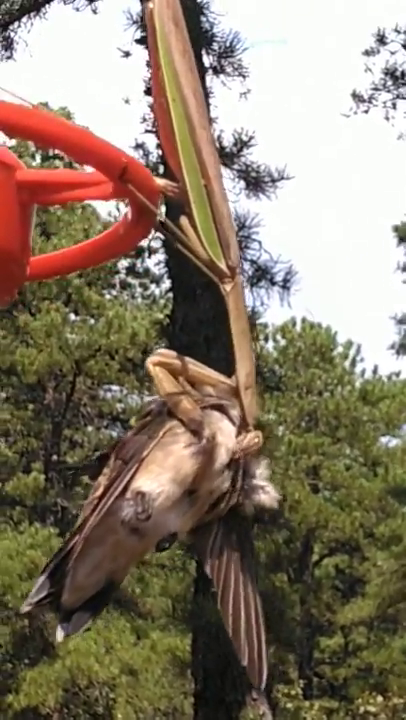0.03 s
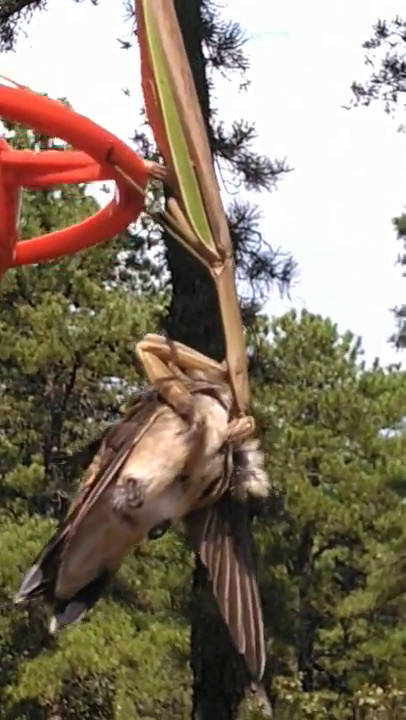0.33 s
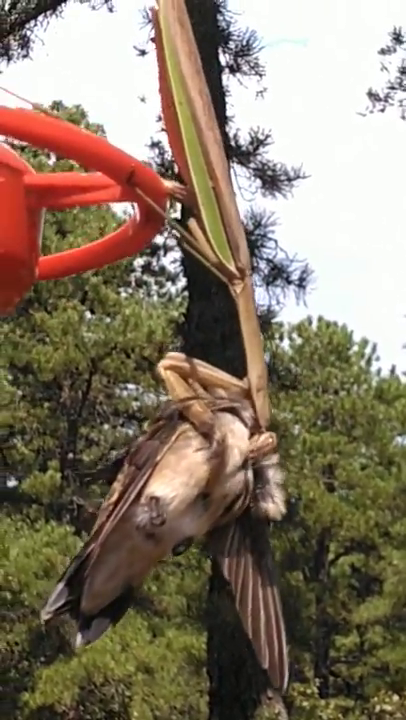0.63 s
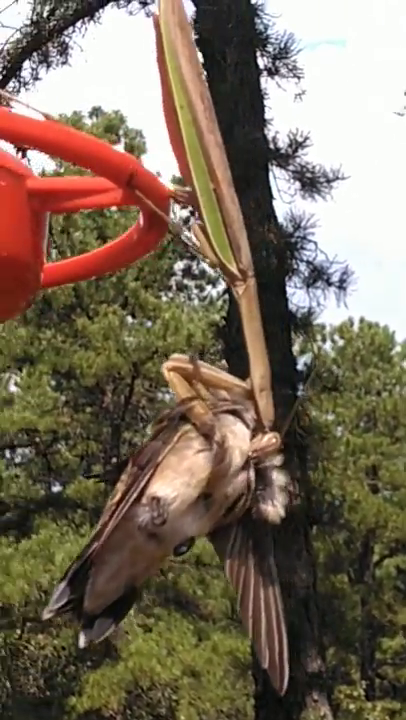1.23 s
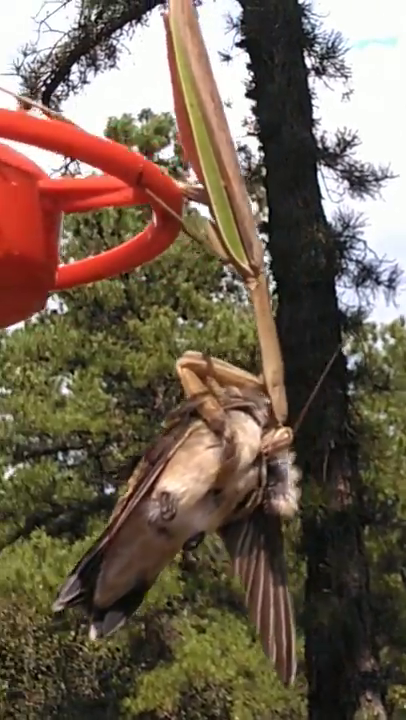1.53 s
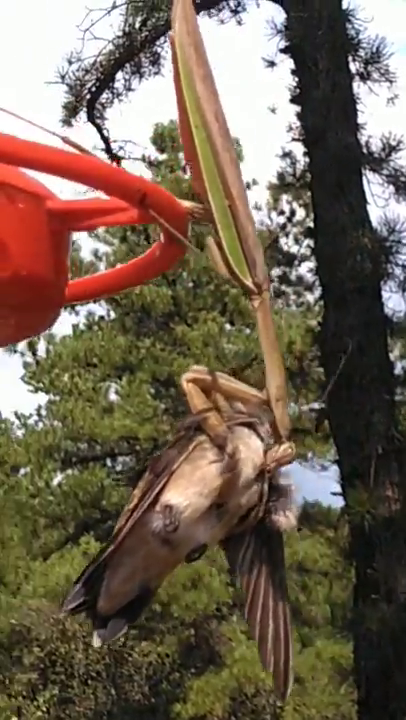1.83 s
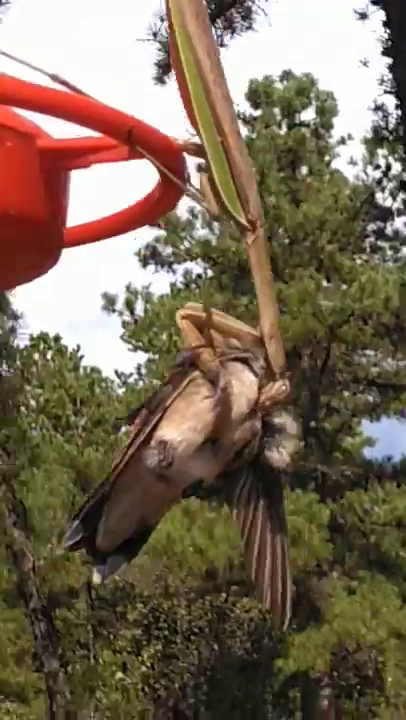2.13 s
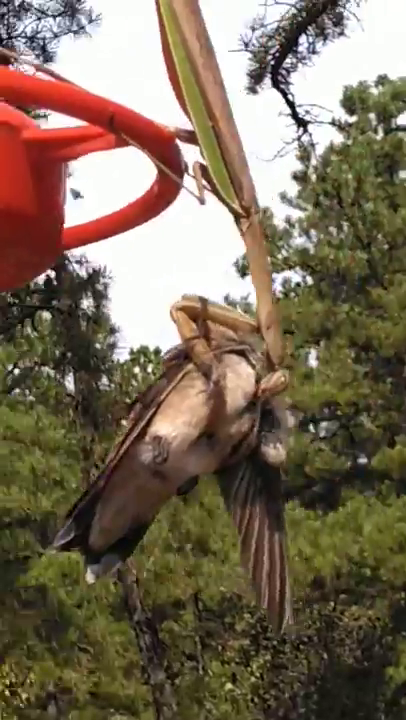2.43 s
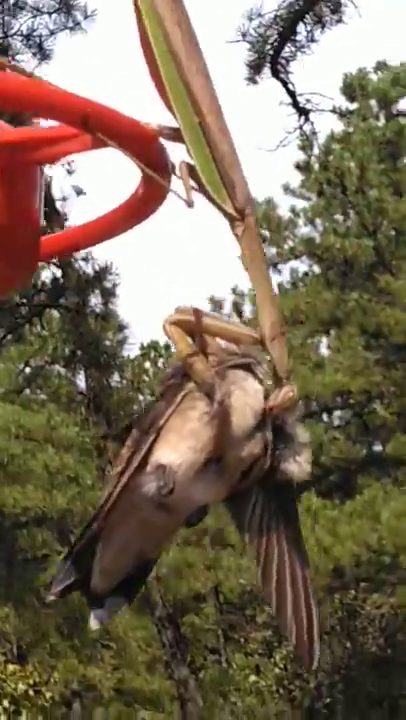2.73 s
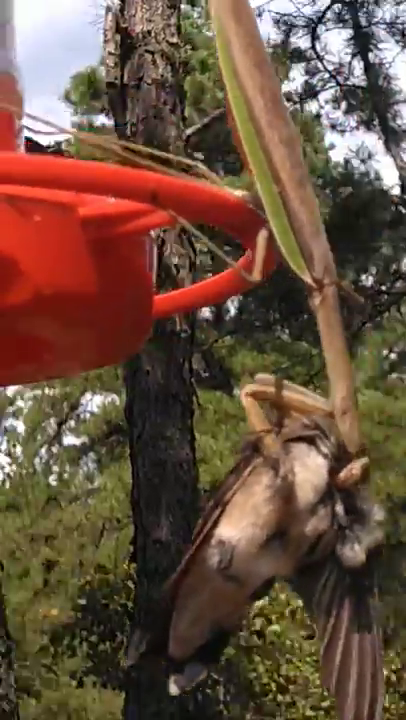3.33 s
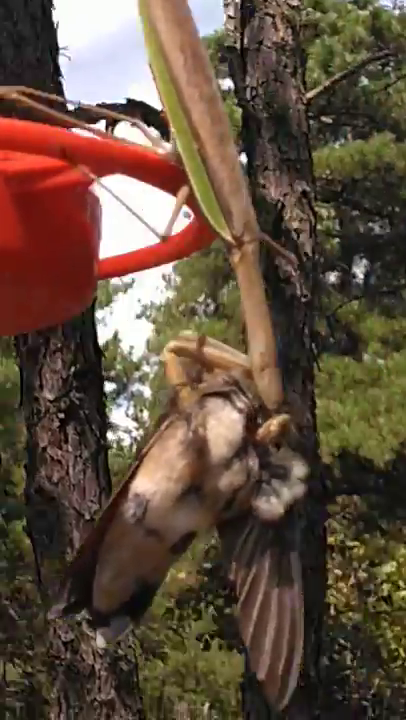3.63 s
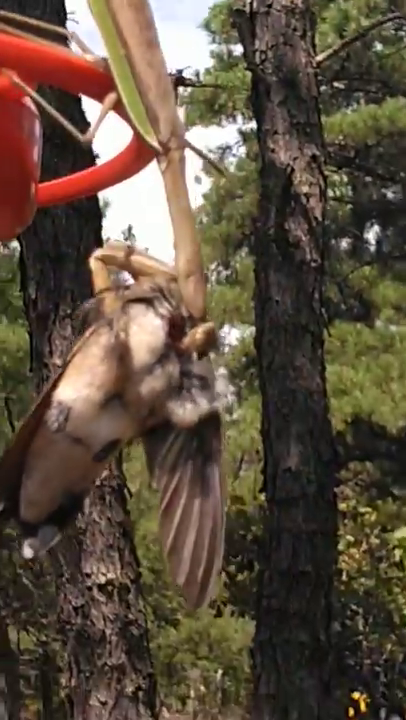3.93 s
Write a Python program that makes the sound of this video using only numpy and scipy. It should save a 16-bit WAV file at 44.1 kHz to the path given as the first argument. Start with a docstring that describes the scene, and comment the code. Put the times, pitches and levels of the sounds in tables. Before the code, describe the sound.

Faint open-air hiss, then a crunchy, crackling shuffle on dry leaves and twigs.

```python
"""First you hear the soft hiss and low rumble of open air in a pine wood, and a few dull bumps as a
hand shifts on a camera. After two seconds someone shuffles over dry needles and leaves: the ground
crunches under the weight, needles crackle, leaves scrape the sole, twigs snap and brittle bits tick.
Crunch, crackle and scrape are each a swarm of tiny clicks. The microphone's opening rings high in
the treble, so the hiss, sizzle, crackle and ticks are strongest near 13 kHz."""
import sys
import numpy as np
from scipy import signal
from scipy.fft import rfft, irfft
from scipy.io import wavfile
from scipy.ndimage import map_coordinates

SR = 44100
rng = np.random.default_rng(int(sys.argv[2]) if len(sys.argv) > 2 else 0)


def wrap_up_sound(samples):
    """Save the sound to the file named by the first command line argument, as 16-bit audio."""
    columns = np.atleast_2d(samples).T
    # keep every value between -1 and 1, then stretch to whole-number steps
    tamed = np.clip(columns, -1, 1)
    steps = np.round(tamed * 32767).astype(np.int16)
    wavfile.write(sys.argv[1], SR, steps)


N = 176400
TIME = np.arange(N) / SR
FREQS = np.fft.rfftfreq(2 * N, 1 / SR)

# Tone of each background sound, from low to high: pitch_hz, level_db
AIR_TONE = [(12, -47), (20, -20), (48, -2.5), (64, -4), (92, -5.5), (198, -11.5), (445, -14), (478, -13.5),
            (668, -13.5), (789, -15), (1370, -18.5), (2310, -28), (6000, -32), (7800, -55), (13200, -120)]
HISS_TONE = [(2000, -28), (5000, -14.5), (7000, -6), (11500, -7), (12800, -6), (13500, 0.5), (14400, -8.5),
             (15800, -4.5)]
CHIRR_TONE = [(6000, -38), (7200, -9), (7800, -3), (8300, -7.5), (9300, -40)]
SIZZLE_TONE = [(9000, -19), (12000, -8), (13500, -1), (14500, -11), (16000, -30)]
# How the far sizzle comes and goes: time_s, level_db
SIZZLE_LEVELS = [(.23, -62.5), (.3, -76), (.66, -74), (.78, -67), (1.3, -63), (1.5, -67), (2.1, -65)]
# Bumps of the hand on the camera: start_s, level_db, pitch_hz
BUMPS = [(.004, -40.5, 68), (1.294, -41.5, 63), (1.562, -46, 69.5), (1.756, -39.5, 69.4),
         (2.527, -41.5, 79)]
# Twigs snapping: start_s, level_db, pitch_hz
SNAPS = [(1.925, -40, 1740), (2.1618, -37, 3080), (2.2724, -37.5, 3200), (2.4182, -28, 2600),
         (2.5358, -29, 1760), (2.556, -29, 2190), (2.5678, -21, 2130), (2.5864, -26, 2490),
         (2.6293, -27, 2070), (2.633, -27, 2020), (2.6382, -30.5, 1520), (2.7215, -33, 1970),
         (2.748, -21.5, 2760), (2.5737, -31, 2000), (2.7483, -27.5, 1090), (2.779, -44, 1150),
         (2.8978, -32.5, 3340), (2.97, -32, 3550), (3.0080, -26.5, 1990), (3.0137, -34, 2800),
         (3.1630, -34.5, 2160), (3.3291, -30, 1620), (3.3691, -29.5, 2010), (3.4032, -36, 1900),
         (3.527, -30, 2220), (3.5977, -33, 1820), (3.733, -41.5, 3150), (3.765, -35.5, 3300),
         (3.834, -37.5, 2760), (3.9085, -34.5, 2350), (3.9534, -36.5, 3240), (3.9747, -35.5, 2380)]
# The notes one twig rings with, all at once: pitch_ratio, level_db
TWIG_NOTES = [(.38, -13.5), (.58, -6), (.8, 4), (1.03, 7.5), (1.35, -1)]
# How each sound under the foot swells and fades: time_s, relative_level_db
CRUNCH_LEVELS = [(2.05, -63), (2.12, -58), (2.165, -50.5), (2.205, -60), (2.32, -52), (2.375, -54),
                 (2.44, -42.5), (2.51, -50.5), (2.56, -41), (2.605, -53), (2.635, -42), (2.685, -60),
                 (2.72, -42), (2.745, -53.5), (2.79, -46.5), (2.84, -55), (2.975, -51.5), (3.01, -39.5),
                 (3.04, -46.5), (3.14, -53), (3.23, -49.5), (3.28, -47), (3.31, -49.5), (3.385, -43.5),
                 (3.43, -45), (3.49, -46.5), (3.58, -45), (3.635, -51), (3.68, -69), (3.76, -59),
                 (4.0, -64)]
CRACKLE_LEVELS = [(2.05, -65), (2.13, -54), (2.19, -50), (2.23, -40.5), (2.265, -41), (2.29, -44),
                  (2.32, -35.5), (2.34, -38), (2.372, -37), (2.41, -39.5), (2.51, -43.5), (2.55, -37),
                  (2.61, -46), (2.69, -49), (2.72, -47), (2.745, -52), (2.80, -46.5), (2.87, -38.5),
                  (2.93, -42), (2.975, -46), (3.012, -38.5), (3.04, -45.5), (3.11, -45.5), (3.19, -50.5),
                  (3.31, -50.5), (3.38, -45.5), (3.49, -45), (3.53, -44.5), (3.61, -48), (3.67, -57.5),
                  (3.82, -55), (4.0, -58.5)]
SCRAPE_LEVELS = [(2.08, -71), (2.16, -53), (2.21, -62.5), (2.42, -51), (2.55, -60), (2.68, -59),
                 (2.79, -52), (2.87, -51), (2.94, -55.5), (3.008, -41), (3.04, -48.5), (3.10, -47),
                 (3.19, -59), (3.45, -59.5), (3.6, -56), (3.68, -69), (3.95, -66)]
# Tone of one tiny click of each kind: pitch_hz, level_db
CRUNCH_TONE = [(150, -44), (500, -23.5), (900, -8.5), (1350, -7), (1750, -0.5), (2100, 1.5), (2450, -7.5),
               (3300, -13.5), (5000, -23), (9000, -23.5), (16000, -43)]
CRACKLE_TONE = [(500, -36.5), (1800, -25.5), (4200, -17.5), (6000, -18.5), (7300, -11), (8600, -13),
                (9700, -10.5), (12000, -7.5), (12900, -1), (13600, 0.5), (14150, -7), (14650, -16),
                (15600, -11.5)]
SCRAPE_TONE = [(400, -20), (1050, 0), (2200, -8), (3000, 2), (4100, 0), (5300, -6), (6300, -8.5),
               (7400, -9), (9000, -8), (12000, -20), (16000, -40)]
TICK_TONE = [(500, -33), (2500, -22.5), (5500, -23.5), (7500, -14), (10000, -12), (12000, -9),
             (13200, -0.5), (13900, -2.5), (14600, -11), (15600, -12)]
# Brittle needles breaking: start_s, peak_db
TICKS = [(2.261, -23), (2.2637, -21), (2.3162, -30), (2.3205, -28), (2.3226, -26), (2.3628, -17),
         (2.3760, -14.5), (2.4166, -16), (2.5522, -23), (2.5852, -20), (2.7198, -19), (2.8633, -23),
         (2.878, -33), (2.9434, -27), (3.0150, -21), (3.099, -23), (3.139, -20.5), (3.1722, -20),
         (3.251, -27), (3.3505, -24), (3.5053, -28), (3.5417, -26.5), (3.9084, -30), (3.9745, -32)]


def gain(db):
    """Turn decibels into a number to multiply by."""
    return 10 ** (np.asarray(db) / 20)


def normalize(sound):
    """Scale a sound so its average power is 1."""
    return sound / np.sqrt(np.mean(sound ** 2) + 1e-20)


def loudness(levels):
    """Join (time_s, level_db) points into a gain for every sample."""
    return gain(np.interp(TIME, *np.transpose(levels)))


def fade(t, fade_s):
    """A gain that falls by 60 dB every fade_s seconds."""
    return gain(-60 * t / fade_s)


def wobble(per_s):
    """A smooth curve through per_s random values a second."""
    return map_coordinates(rng.standard_normal(4000), [TIME * per_s], mode="wrap")


def tone_db(tone, hz):
    """Read a tone table's level at any pitch, with octaves evenly spaced."""
    pitches, levels = np.transpose(tone)
    return np.interp(np.log(hz + 1), np.log(pitches + 1), levels)


def noise(tone):
    """Steady noise with the given tone."""
    spectrum = rfft(rng.standard_normal(2 * N)) * gain(tone_db(tone, FREQS))
    return normalize(irfft(spectrum)[:N])


def click(tone, vary_db, size=1024):
    """One tiny break, with a slightly random ring of its own."""
    hz = np.fft.rfftfreq(size, 1 / SR)
    own_ring = map_coordinates(rng.standard_normal(48), [np.sqrt(hz / hz[-1]) * 47])
    spectrum = gain(tone_db(tone, hz) + vary_db * own_ring)
    # Keep the tone but pack the energy at the start, so the click begins sharply.
    cepstrum = irfft(np.log(spectrum))
    cepstrum[1:size // 2] *= 2
    cepstrum[size // 2 + 1:] = 0
    pulse = irfft(np.exp(rfft(cepstrum)))
    return pulse / np.linalg.norm(pulse)


def click_swarm(tone, per_s, spread_db, vary_db, pieces=24):
    """About per_s random breaks a second, shared among pieces that each ring differently."""
    out = np.zeros(N)
    for _ in range(pieces):
        when, size, sign, chance = rng.random((4, 1500))
        boost_db = spread_db * np.clip(-np.log(1 - size), 0, 3.5)  # many weak breaks, few strong
        strengths = gain(boost_db) * np.sign(sign - .5)
        happens = chance < per_s * N / SR / pieces / len(chance)
        hits = np.bincount((when * N).astype(int), strengths * happens, N)
        out += signal.oaconvolve(hits, click(tone, vary_db))[:N]
    return normalize(out)


def add(out, start_s, sound):
    """Mix a sound into out, beginning at start_s."""
    part = out[max(round(start_s * SR), 0):][:len(sound)]
    part += sound[:len(part)]


def open_air():
    """A faint low rush, a steady hiss, and a thin chirr and sizzle like far insects."""
    rush = gain(-51 + 0.12 * wobble(per_s=8.53)) * noise(AIR_TONE)
    chirr = gain(-71 + 3 * wobble(per_s=21.87)) * noise(CHIRR_TONE)
    hiss = gain(-59) * noise(HISS_TONE)
    sizzle = loudness(SIZZLE_LEVELS) * noise(SIZZLE_TONE)
    return rush + hiss + chirr + sizzle


def hand_bumps(rise_s=0.015, fade_s=0.065):
    """The hand shifts on the camera body, which gives a few slow shakes."""
    out, t = np.zeros(N), TIME[:SR // 4]
    swell = (1 - np.exp(-(t / rise_s) ** 2)) * fade(t, fade_s)
    swell /= swell.max()
    for start_s, level_db, pitch_hz in BUMPS:
        add(out, start_s, gain(level_db) * swell * np.sin(2 * np.pi * pitch_hz * t))
    return out


def twig_snaps(rise_s=0.00013, ring_fade_s=0.006, splinter_db=-16, splinter_fade_s=0.017):
    """Each twig bends, rings for an instant and sheds splinters."""
    out, t = np.zeros(N), TIME[:SR // 20]
    for start_s, level_db, pitch_hz in SNAPS:
        ring = np.zeros(len(t))
        for ratio, note_db in TWIG_NOTES:
            strength = gain(note_db + rng.normal(0, 3.4))
            note_hz = pitch_hz * ratio * rng.normal(1, 0.056)
            ring += strength * np.sin(2 * np.pi * (note_hz * t + rng.random()))
        ring *= (1 - np.exp(-(t / rise_s) ** 2)) * fade(t, ring_fade_s)
        splinters = np.convolve(rng.standard_normal(len(t)), click(SCRAPE_TONE, vary_db=5))[:len(t)]
        splinters *= gain(splinter_db) * fade(t, splinter_fade_s)
        add(out, start_s, gain(level_db) * (ring / abs(ring).max() + splinters))
    return out


def footwork(levels, start_s=2.04, rise_s=0.042):
    """Loudness under the foot: silent until it moves, then 1 dB below the given levels."""
    contact = np.clip((TIME - start_s) / rise_s, 0, 1)
    return gain(-1) * contact * loudness(levels)


def ground_crunch():
    """Fallen needles and leaves give way under the foot: woody clicks over fine rubbing."""
    clicks = click_swarm(CRUNCH_TONE, per_s=1000, spread_db=4.5, vary_db=5)
    rubbing = gain(-5) * noise(CRUNCH_TONE)
    return footwork(CRUNCH_LEVELS) * normalize(clicks + rubbing)


def needle_crackle():
    """Dry needles scuff past each other in small clumps of bright clicks."""
    clicks = click_swarm(CRACKLE_TONE, per_s=1500, spread_db=2.5, vary_db=4)
    rubbing = gain(-5.5) * noise(CRACKLE_TONE)
    clumps = gain(1.8 * wobble(per_s=80))
    return clumps * footwork(CRACKLE_LEVELS) * normalize(clicks + rubbing)


def leaf_scrape():
    """Dead leaves scrape along the sole with coarse, papery clicks."""
    clicks = click_swarm(SCRAPE_TONE, per_s=1400, spread_db=6, vary_db=4)
    rubbing = gain(-5) * noise(SCRAPE_TONE)
    return footwork(SCRAPE_LEVELS) * normalize(clicks + rubbing)


def needle_ticks(burst_fade_s=0.0031, crumble_db=-17, crumble_fade_s=0.018):
    """A needle breaks in a quick burst of tiny cracks, then crumbles briefly."""
    out, t = np.zeros(N), TIME[:SR // 50]
    force = fade(t, burst_fade_s) + gain(crumble_db) * fade(t, crumble_fade_s)
    for start_s, peak_db in TICKS:
        cracks = force * rng.standard_normal(len(t))
        tick = np.convolve(cracks, click(TICK_TONE, vary_db=-0.5))
        add(out, start_s, gain(peak_db) * tick / abs(tick).max())
    return out


def scene():
    """All the sounds reach one microphone, with no echo."""
    shuffle = ground_crunch() + leaf_scrape() + needle_crackle() + twig_snaps() + needle_ticks()
    return (shuffle + hand_bumps() + open_air())[None]


def record(dry, top_hz=15760):
    """The camera picks up nothing higher than top_hz."""
    return irfft(rfft(dry, 2 * N) * (FREQS < top_hz))[:, :N]


dry = scene()
out = record(dry)
wrap_up_sound(out)
```